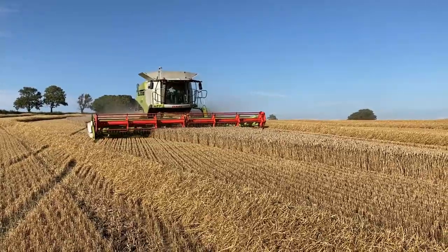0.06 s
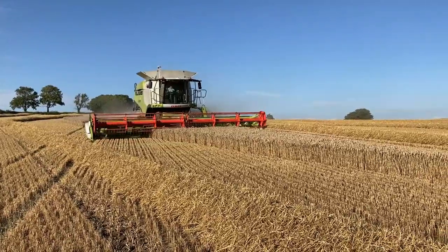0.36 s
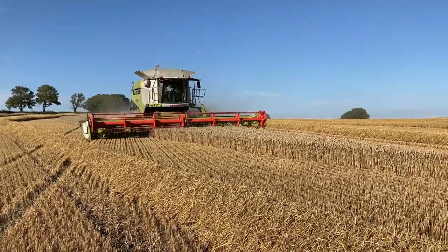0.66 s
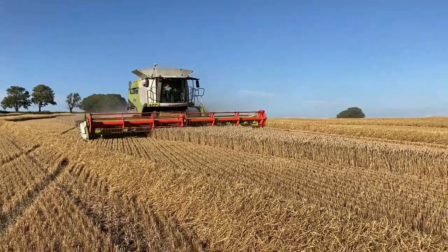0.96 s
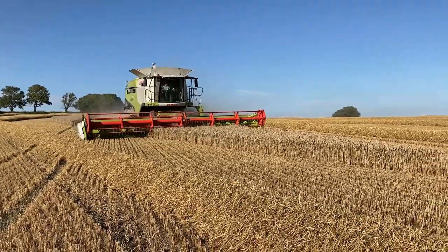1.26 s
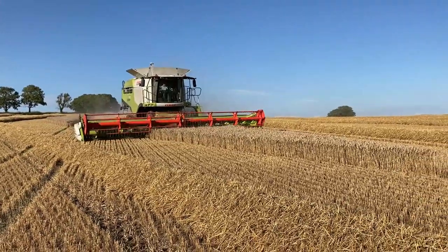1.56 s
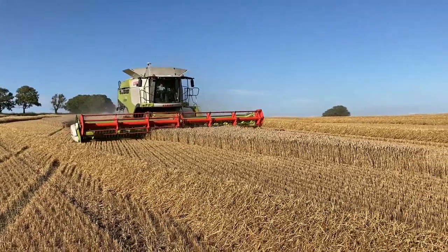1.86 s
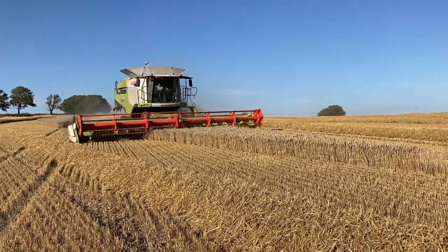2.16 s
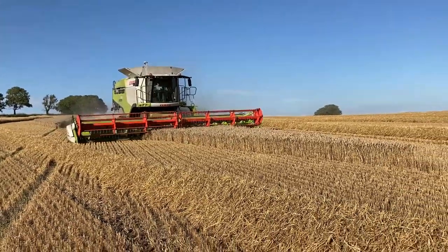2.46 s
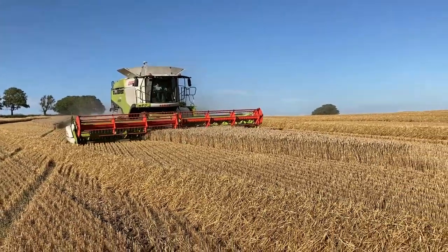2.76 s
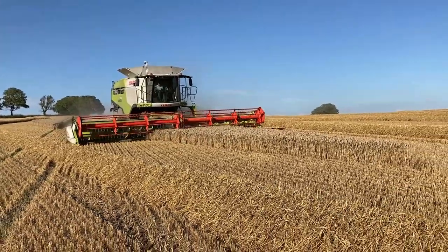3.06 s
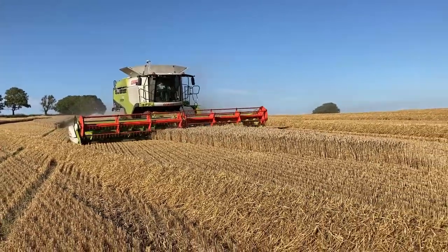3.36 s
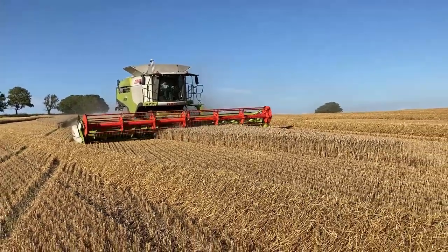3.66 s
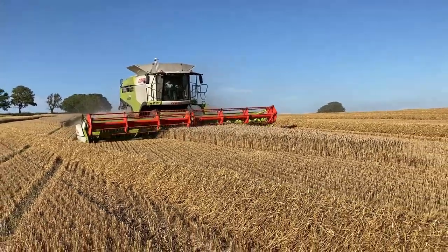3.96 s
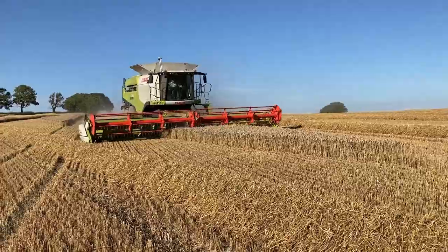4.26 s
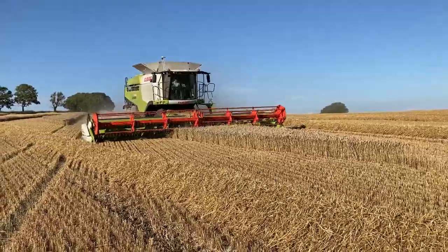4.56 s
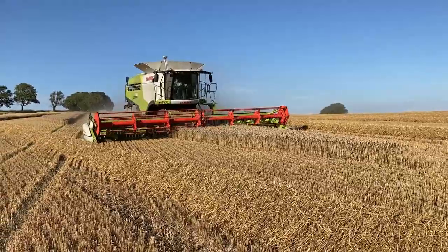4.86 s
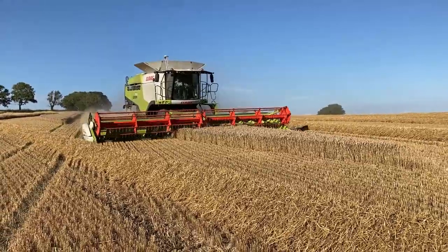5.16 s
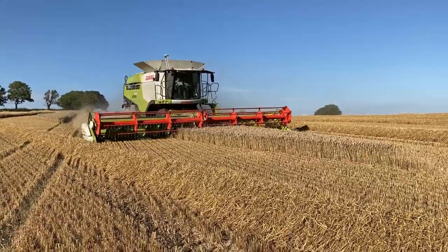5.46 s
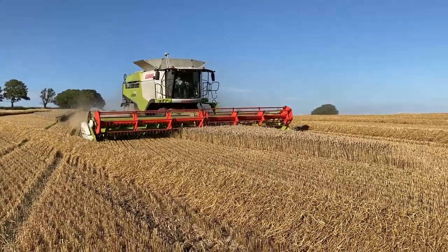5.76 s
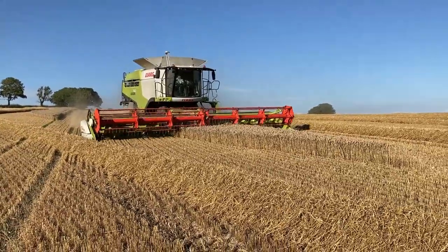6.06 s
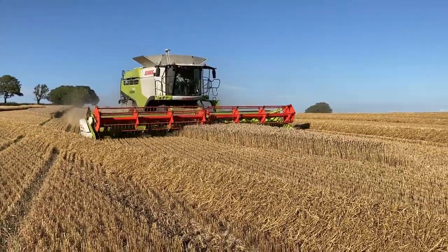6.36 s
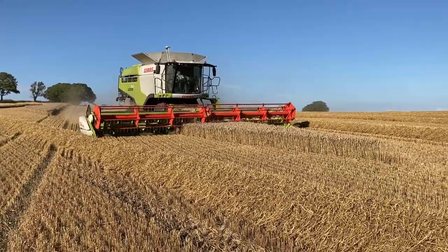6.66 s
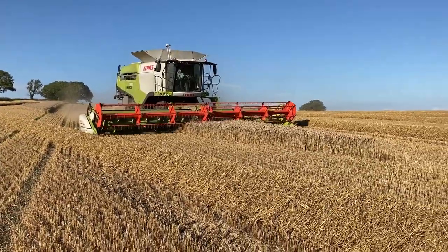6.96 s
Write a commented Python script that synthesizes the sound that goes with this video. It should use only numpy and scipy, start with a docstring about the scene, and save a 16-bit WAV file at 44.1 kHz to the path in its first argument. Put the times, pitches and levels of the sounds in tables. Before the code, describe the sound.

A combine harvester works through a dry wheat field, slowly coming closer. Its diesel engine and threshing drum drone steadily over a low rumble, a throbbing hum and a rushing roar with ringing metal panels. The cutter swishes through the stalks, with an occasional crunch of straw and two faint metal squeaks. A light breeze brushes the microphone, mostly near the start.

```python
"""A combine harvester works its way slowly towards a phone held at the edge of a dry wheat field.
One diesel engine drives everything: the threshing drum drones, the straw chopper hums, the body
roars and rings, and the cutter bar swishes through the stalks about 21 times a second.
Tufts of straw snap, metal squeaks faintly, and a light breeze brushes the microphone."""
import sys
import numpy as np
from scipy import signal
from scipy.fft import rfft, irfft
from scipy.io import wavfile

SR = 44100
rng = np.random.default_rng(int(sys.argv[2]) if len(sys.argv) > 2 else 0)


def master_out(mix):
    """Clip the mix to full scale and print it as 16-bit PCM to the path in sys.argv[1]."""
    frames = np.transpose(np.atleast_2d(mix))
    ceiling = np.clip(frames, -1, 1)
    pcm = np.round(ceiling * 32767).astype(np.int16)
    wavfile.write(sys.argv[1], SR, pcm)


N = 313110
TIME = np.arange(N) / SR
FREQ = np.maximum(np.fft.rfftfreq(N, 1 / SR), 1)


def undb(db):
    """Turn decibels into a gain, a number to multiply a sound by."""
    return 10 ** (np.asarray(db) / 20)


def unit(x):
    """Scale a signal so that its average size (rms) is 1."""
    return x / np.sqrt(np.mean(x ** 2))


def over_freq(points):
    """Join (Hz, value) points into a curve, giving every octave equal room."""
    hz, value = np.transpose(points)
    return np.interp(np.log(FREQ), np.log(hz), value)


def shape(x, gain):
    """Give each frequency its own gain, then scale the result to size 1."""
    return unit(irfft(rfft(x) * gain, N))


def resonance(hz, width_hz):
    """The gain per frequency of something that rings at one pitch."""
    return 1 / (1 + 1j * hz / width_hz * (FREQ / hz - hz / FREQ))


def noise():
    """Two unrelated noises: the part both microphone openings share and the part that differs."""
    return rng.standard_normal((2, N))


def wander(rate_hz):
    """A smooth random curve of size 1; a higher rate makes it turn more often."""
    return shape(rng.standard_normal(N), np.exp(-(FREQ / rate_hz) ** 2) * (FREQ > 1))


def cycle(hz, crest_s, depth_db):
    """A gain that rises and falls evenly, with one peak at crest_s."""
    return undb(depth_db * np.cos(2 * np.pi * hz * (TIME - crest_s)))


def swell(peak_s, db, length_s):
    """A gain that rises and falls once, in a bell shape."""
    return undb(db) * np.exp(-.5 * ((TIME - peak_s) / length_s) ** 2)


def swells(table):
    """Add up one swell for each row of a table."""
    return sum(swell(*row) for row in table)


def fade_up(start_db, settle_s=1.12):
    """A gain that starts low and settles at 1."""
    return undb(start_db * np.exp(-TIME / settle_s))


def tone(hz, clock, flutter_db, wobble_rad):
    """One tone of a turning part; moving air makes its level and phase waver."""
    phase = 2 * np.pi * (hz * clock + rng.random()) + wobble_rad * wander(4.0)
    return np.sqrt(2) * np.sin(phase) * unit(undb(flutter_db * wander(7.1)))


def rotor(tones, clock, wobble_rad):
    """Add up the tones of spinning parts."""
    return sum(undb(db) * tone(hz, clock, flutter_db, wobble_rad) for hz, db, flutter_db in tones)


def breeze(calm_db=-25.5, uneven_db=2.0):
    """Air brushes the microphone: a deep noise that rises in gusts, with a few soft thumps."""
    # The tone colour of the wind. Each row: frequency in Hz, relative level in dB.
    air_colour = [(15, -38), (28, -23), (40, -6), (60, 1.5), (85, 0), (110, -2), (200, -18), (500, -56)]
    # Gusts. Each row: time of the peak in seconds, level in dB, length in seconds.
    gusts = [(.24, -19, 0.12), (1.25, -21, 0.28), (2.45, -24, .1), (6.9, -25, .35)]
    # Puffs that hit the microphone. Each row: time in seconds, level in dB, length in seconds.
    buffets = [(.98, -16.5, 0.023), (1.08, -28, 0.04), (1.35, -15.5, 0.016), (2.1, -14, 0.03)]
    strength = np.hypot(undb(calm_db), swells(gusts)) * undb(uneven_db * wander(20))
    air = strength * shape(noise(), undb(over_freq(air_colour)))
    thumps = swells(buffets) * shape(noise(), resonance(hz=80, width_hz=85) ** 2)
    return air + thumps


def squeaks(width_hz=90):
    """Metal rubs now and then and sings faintly at one pitch."""
    # Each row: time of the peak in seconds, pitch in Hz, level in dB, length in seconds.
    rubs = [(3.96, 3380, -40, .06), (6.76, 3600, -40, 0.18)]
    return sum(swell(peak_s, db, length_s) * shape(noise(), resonance(hz, width_hz) ** 2)
               for peak_s, hz, db, length_s in rubs)


def stalks(grain_db):
    """Dry stalks make countless tiny cracks, a few much louder than the rest."""
    # The tone colour of breaking straw. Each row: frequency in Hz, relative level in dB.
    straw_colour = [(1500, -2), (3000, -6.5), (4300, -1), (5300, -0.5), (6400, -1.5), (8500, 2),
                    (10000, 2.5), (12000, -2.5), (14000, -6.5), (15500, -21)]
    cracks = noise() * undb(grain_db * np.minimum(rng.exponential(size=N), 7))
    return shape(cracks, undb(over_freq(straw_colour)))


def snaps():
    """Thicker tufts of straw break with a short crunch."""
    # Each row: time of the snap in seconds, level in dB, length in seconds.
    tufts = [(.632, -29.5, .008), (1.26, -40, .008), (1.885, -31.5, .008), (2.173, -33, 0.0091),
             (2.812, -33, .0093), (2.947, -36, .012), (5.985, -33, .008), (6.05, -32, .01),
             (6.33, -29, .03)]
    return stalks(grain_db=4.5) * swells(tufts)


def cutter(clock, stroke_hz=20.741, depth=0.28, lopsided=0.25, uneven_db=0.92):
    """The knife shears a row of stalks on each stroke; one direction cuts harder than the other."""
    strokes = stroke_hz * clock + .044
    knife_speed = np.cos(np.pi * strokes)
    bite = knife_speed ** 4 * (1 - lopsided * knife_speed)
    return unit(stalks(grain_db=1.7) * (1 + depth * bite) * undb(uneven_db * wander(34)))


def wheat(clock, level_db=-34.0, patchy_db=0.65):
    """The turning reel feeds wheat of uneven thickness to the knife in waves."""
    thickness = undb(level_db + patchy_db * wander(6.1))
    feed = cycle(hz=1.17, crest_s=.39, depth_db=0.4)
    return thickness * feed * cutter(clock)


def panels(steady_db=-34.3, surge_db=1.66, clatter_db=1.66):
    """Straw beats on the metal panels, which ring louder while a thick wad goes through."""
    # The notes of the sheet metal. Each row: pitch in Hz, width in Hz, relative level in dB.
    notes = [(871, 76, -5.5), (983, 94, -5), (1350, 75, 0.5), (1707, 41, -5.5), (1842, 49, -.5),
             (2220, 31, -4.5), (2366, 92, -5.5), (2755, 130, -14), (3460, 200, -7.5), (4650, 130, -16.5)]
    # Passing wads of straw. Each row: time of the peak in seconds, level in dB, length in seconds.
    wads = [(.72, -33, 0.15), (1.28, -31, 0.036), (1.62, -33.5, 0.11), (2.22, -29.5, 0.053),
            (3.82, -33, 0.055), (6.7, -35, 0.055)]
    blows = undb(clatter_db * wander(51))  # shared by all panels
    ringing = 0
    for hz, width_hz, db in notes:
        surge = undb(db + surge_db * wander(7.5))
        ringing += surge * shape(noise() * blows, resonance(hz, width_hz))
    return np.hypot(undb(steady_db), swells(wads)) * unit(ringing)


def roar(crank_hz, clock, level_db=-29.5, firing_depth=0.044, swirl_db=1.84):
    """Threshing, fans and burning fuel make a rush that throbs faintly as the engine fires."""
    # The tone colour of the rush. Each row: frequency in Hz, relative level in dB.
    roar_colour = [(150, -31), (300, -2), (430, -2), (600, 2.5), (800, -2.5), (1000, 1.5), (1400, -5.5),
                   (1600, -7.5), (1900, -5.5), (2400, -4), (3300, -9), (4300, -16.5), (6500, -22.5),
                   (12000, -29)]
    firings = np.cos(2 * np.pi * 3 * crank_hz * clock)  # three for each turn of the engine
    spectrum = rfft(noise() * (1 + firing_depth * firings)) * undb(over_freq(roar_colour))
    octaves = np.log2(FREQ / 125)  # counted up from 125 Hz
    rush = 0
    for octave in range(8):  # swirling air lets each octave fade in and out on its own
        band = irfft(spectrum * np.maximum(1 - abs(octaves - octave), 0), N)
        rush += band * undb(swirl_db * wander(23))
    return undb(level_db) * unit(rush)


def rumble(level_db=-25.5, lurch_db=1.7):
    """The body shakes with a low, uneven chugging."""
    # The tone colour of the shaking. Each row: frequency in Hz, relative level in dB.
    rumble_colour = [(50, -30), (90, -6.5), (110, 0.5), (145, 3), (190, -0.8), (235, -3.8), (270, -9.7),
                     (320, -22), (500, -38)]
    chug = cycle(hz=17.4, crest_s=.025, depth_db=1.5)
    shaking = fade_up(start_db=-3.5) * chug * undb(level_db + lurch_db * wander(7.3))
    return shaking * shape(noise(), undb(over_freq(rumble_colour)))


def reflection(x, echo_s=0.002215, echo_gain=0.19):
    """A surface close to the phone adds a very quick echo, weaker above 3000 Hz."""
    echo = echo_gain * np.exp(-2j * np.pi * FREQ * echo_s) / (1 + (FREQ / 3000) ** 4)
    return irfft(rfft(x) * (1 + echo), N)


def diesel(crank_hz, clock, level_db=-35.5):
    """The exhaust and engine block hum at whole multiples of the engine's turning speed."""
    # The engine's tones. Each row: multiple of the turning speed, relative level in dB.
    orders = [(6, -3.5), (7, -8.5), (12, -12), (15, -13), (16, -27), (17, -15), (18, -13), (19, -11),
              (20, -15), (24, -15), (30, -13), (36, -27), (51, -15.5)]
    hum = sum(undb(db) * tone(order * crank_hz, clock, flutter_db=3, wobble_rad=0.43)
              for order, db in orders)
    return undb(level_db) * hum


def chopper(clock, level_db=-24.5):
    """The spinning straw chopper gives a throbbing hum."""
    # Each row: pitch in Hz at average engine speed, relative level in dB, flutter in dB.
    tones = [(82.75, -12.5, 1), (117.3, -0.7, 2.4), (119.8, -13, 2.8), (134.6, -9.5, 1.4),
             (470.3, -17, 2.6)]
    throb = cycle(hz=2.84, crest_s=.338, depth_db=2)
    return undb(level_db) * throb * rotor(tones, clock, wobble_rad=0.31)


def drum_and_chopper_overtone(clock, level_db=-22):
    """The threshing drum's drone and a faint overtone of the straw chopper swell in together."""
    # The drum's tone comes first, then the chopper's overtone.
    # Each row: pitch in Hz at average engine speed, relative level in dB, flutter in dB.
    tones = [(168.5, 0, 0.66), (233.4, -18.5, 2)]
    return undb(level_db) * fade_up(start_db=-13.5) * rotor(tones, clock, wobble_rad=.069)


def microphones(sound):
    """Make left and right: sound reaches the phone's two openings at slightly different times."""
    # How alike the two sides are. Each row: frequency in Hz, likeness from 0 to 1.
    likeness_points = [(30, 0.82), (130, 0.86), (250, 0.94), (500, 0.94), (1300, 0.94), (2000, 0.65),
                       (2800, 0.88), (3400, 0.3), (4300, .3), (5300, 0.54), (6400, 0.25), (7500, 0.8),
                       (9100, 1), (12000, 1)]
    # How far the left side is ahead. Each row: frequency in Hz, phase in radians.
    lead_points = [(0, 0), (700, 0), (1400, -0.17), (2000, 1.4), (2800, 1.57), (3400, 2.5), (4300, 0),
                   (5400, 3), (6200, 2), (6900, 0), (9100, -3), (16000, -13)]
    # How much louder the left side is. Each row: frequency in Hz, level in dB.
    balance_points = [(150, 0.5), (450, -0.5), (850, -2.3), (1150, -0.7), (1400, 0), (1650, 1),
                      (2050, -1.5), (2300, 0.5), (2600, -1), (3400, 2), (4300, 2), (5000, 0), (6200, -0.8),
                      (7200, .8), (8500, 0)]
    likeness = over_freq(likeness_points)
    shared, apart = rfft(sound)
    shared = shared * np.sqrt((1 + likeness) / 2)
    apart = apart * np.sqrt((1 - likeness) / 2)
    lead = np.interp(FREQ, *np.transpose(lead_points))
    tilt = np.exp(.5j * lead) * undb(over_freq(balance_points) / 2)  # each side takes half
    return irfft(np.array([(shared + apart) * tilt, (shared - apart) / tilt]), N)


def scene(start_m=29.7, speed_m_s=1.33):
    """The tones and the knife follow the engine; the machine grows louder as it drives closer."""
    # The working engine's speed. Each row: time in seconds, turns per minute.
    engine_speed = [(0.0, 1944.6), (1.0, 1939.5), (1.7, 1954.6), (2.3, 1958.8), (3.1, 1956.0),
                    (3.7, 1936.5), (4.4, 1953.5), (5.2, 1966.9), (6.0, 1966.2), (7.1, 1951.8)]
    rpm = np.interp(TIME, *np.transpose(engine_speed))
    crank_hz = rpm.mean() / 60
    clock = np.cumsum(rpm / rpm.mean()) / SR  # seconds that run faster when the engine does
    nearness = start_m / (start_m - speed_m_s * TIME)  # a gain, 1 at the start
    body = rumble() + reflection(roar(crank_hz, clock) + panels())
    machinery = nearness * (body + wheat(clock))
    drone = nearness * (drum_and_chopper_overtone(clock) + chopper(clock) + diesel(crank_hz, clock))
    return drone + microphones(machinery + snaps() + squeaks() + breeze())


def record(dry):
    """The phone cuts off the highest treble, above 15700 Hz."""
    low_pass = signal.ellip(10, .1, 80, 15700, fs=SR, output="sos")
    return signal.sosfilt(low_pass, dry)


dry = scene()
out = record(dry)
master_out(out)
```